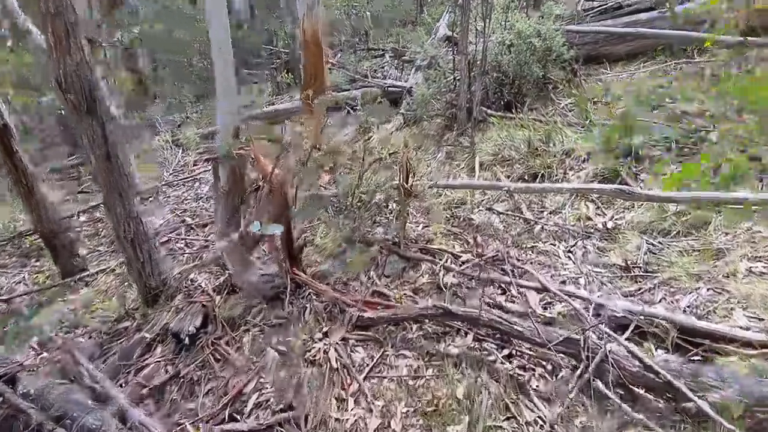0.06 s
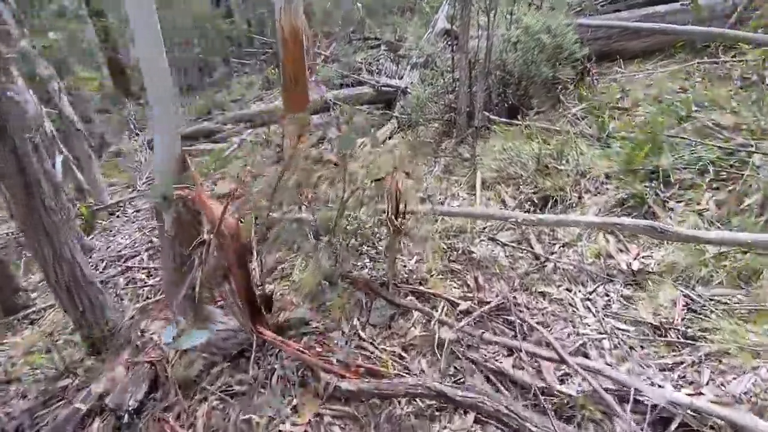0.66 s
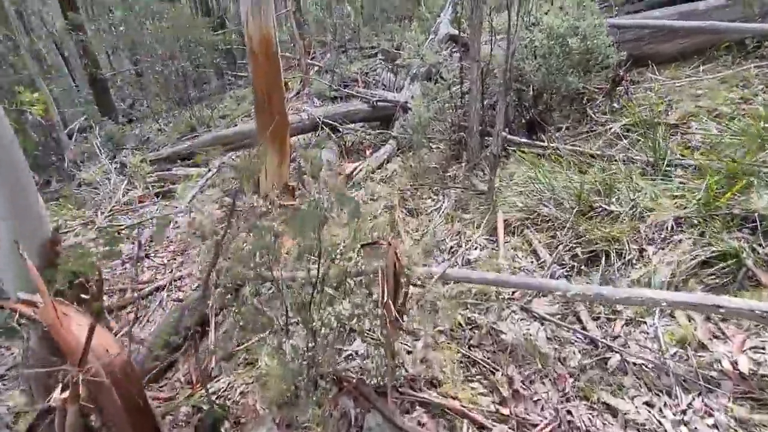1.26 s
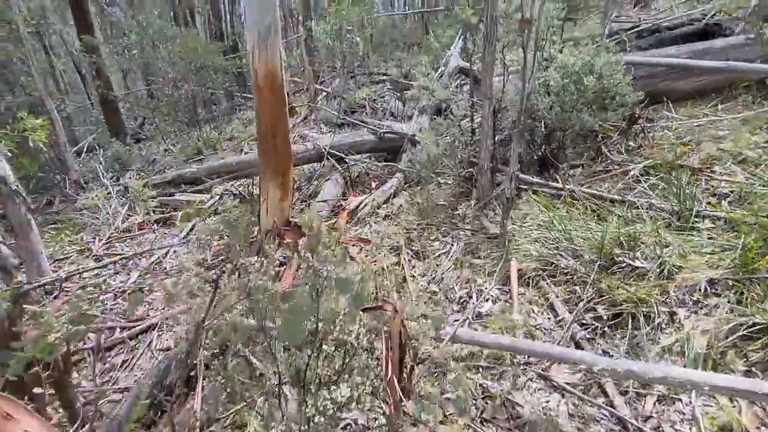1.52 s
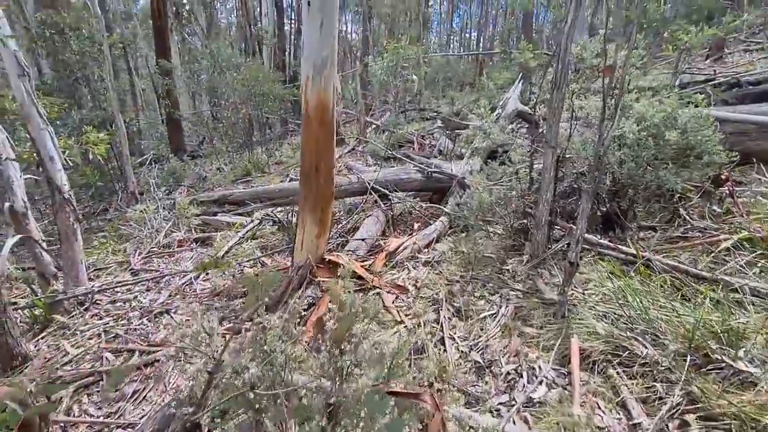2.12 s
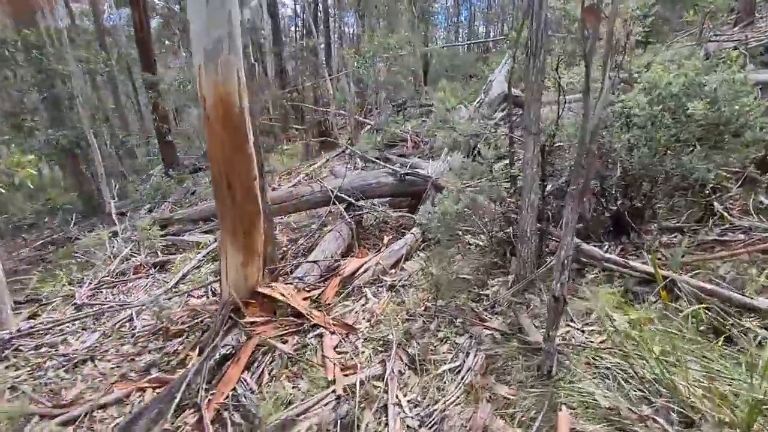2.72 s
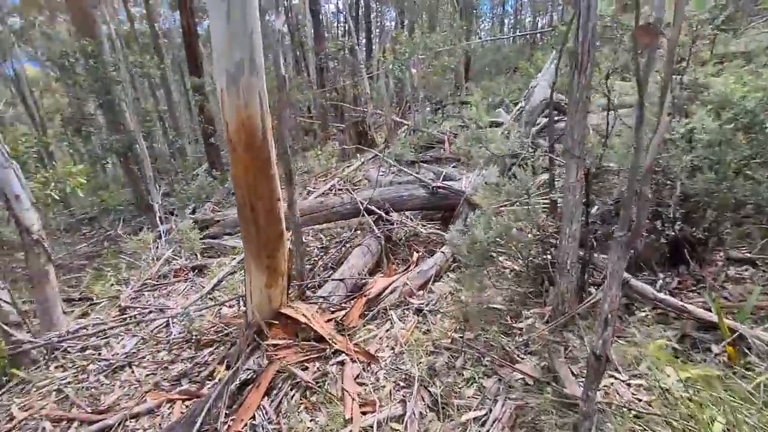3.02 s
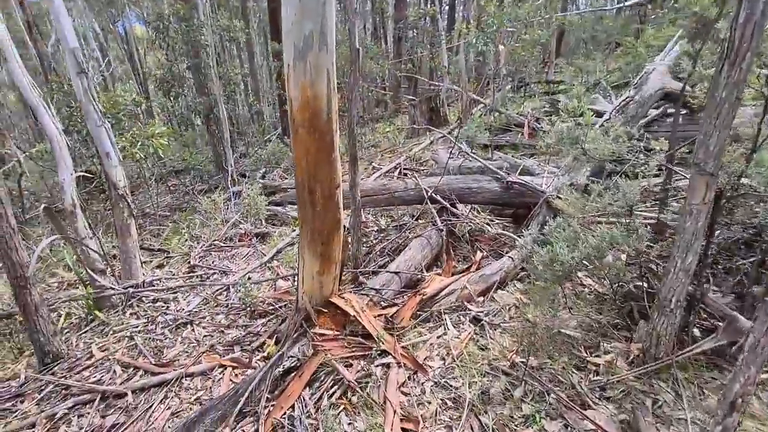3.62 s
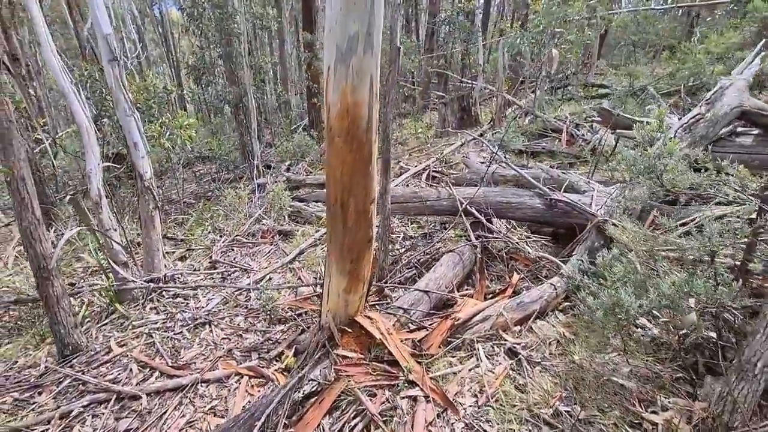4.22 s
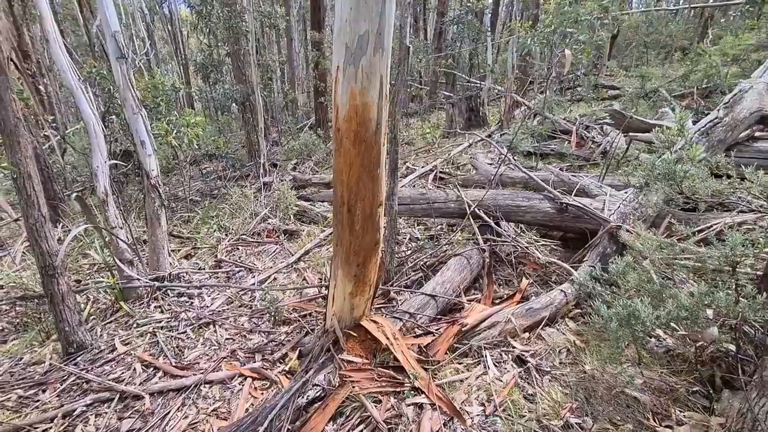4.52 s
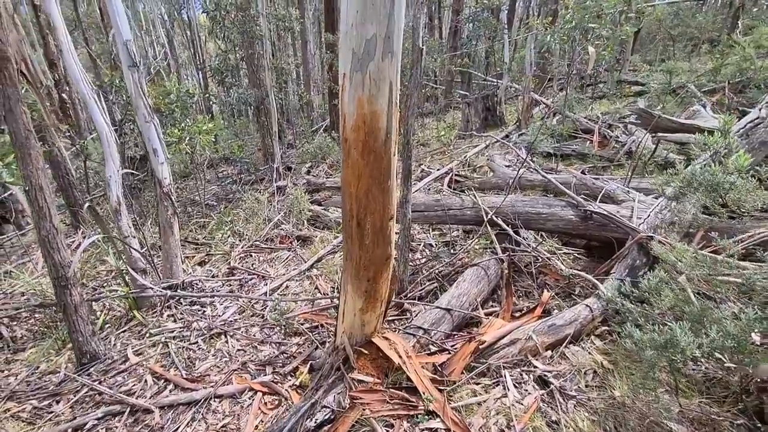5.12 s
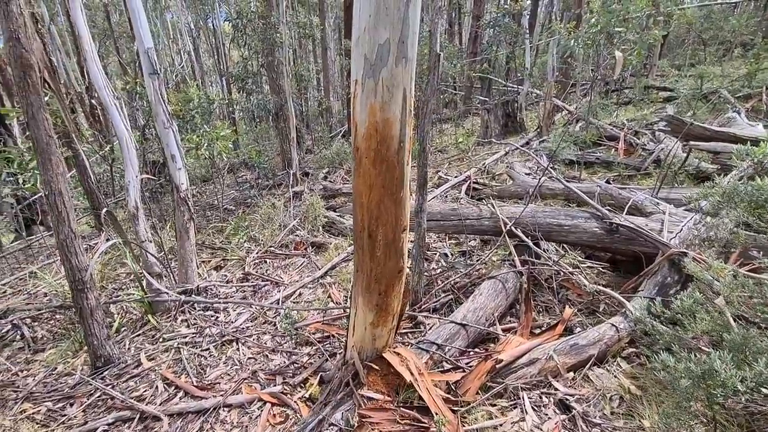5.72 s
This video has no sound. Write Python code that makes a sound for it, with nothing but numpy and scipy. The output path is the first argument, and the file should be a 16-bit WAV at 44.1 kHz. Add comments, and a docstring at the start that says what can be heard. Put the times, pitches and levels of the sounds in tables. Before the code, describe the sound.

In a still forest, a hand-held microphone follows someone treading slowly through brittle leaves, bark and sticks. At first, loud clicks and low, gritty rubs hit the right channel over dull crunching. Then the crackle brightens, with sharp twig snaps, brief shoe scuffs and another short bump on the microphone. After one last firm crunch the steps fade to light ticks, with faint forest air underneath.

```python
"""Slow footsteps through dry leaves, bark and sticks in a still forest, heard from a hand-held camera.
Each step crushes a swarm of brittle leaves over soft soil. Twigs snap, the shoe scuffs, stalks tick.
Mostly early on, something like passing scrub knocks and rubs the right microphone, and a few soft
bumps sway the camera. A faint hush of forest air lies underneath."""
import sys
import numpy as np
from scipy import signal
from scipy.io import wavfile
from scipy.ndimage import uniform_filter1d

SR = 44100
rng = np.random.default_rng(int(sys.argv[2]) if len(sys.argv) > 2 else 0)


def dump_mix(stems):
    """Bounce the given channels to the path in sys.argv[1] as a 16-bit WAV at rate SR."""
    frames = np.atleast_2d(stems).T  # one column per channel
    limited = np.clip(frames, -1, 1)  # hard clip at full scale
    pcm = np.round(limited * 32767).astype(np.int16)
    wavfile.write(sys.argv[1], SR, pcm)


N = 254016
TIME = np.arange(N) / SR
CONTROL_TIME = TIME[::64]

# A foot presses or drags through the litter:
# (time at full weight [s], rise [s], hold [s], crunch [dB], soil [dB], fizz relative to crunch [dB])
FOOT_PRESSES = [(0.0, .02, .1, -44, -57.5, -14), (0.133, .015, 0.021, -33.5, -50.5, -16.5),
                (0.33, 0.13, .08, -46, -53.5, -8.5), (0.462, 0.054, 0.16, -48.5, -61.5, -9.5),
                (0.811, 0.36, 0.13, -52, -61.5, -12), (0.968, 0.023, 0.012, -30.5, -51, -15),
                (1.058, 0.12, 0.072, -36.5, -54.5, -15), (1.264, 0.3, 0.13, -45, -53.5, -19),
                (1.43, .05, 0.11, -51.5, -57.5, -15), (1.611, .1, 0.16, -49.5, -68, -15),
                (1.85, 0.25, 0.18, -53.5, -63.5, -19), (2.076, .12, 0.057, -49.5, -62.5, -21),
                (2.289, 0.11, .05, -42, -57, -17.5), (2.359, 0.024, 0.079, -37, -58, -11.5),
                (2.561, 0.13, 0.076, -34.5, -45, -16), (2.695, 0.027, 0.012, -34, -47, -10),
                (2.785, .04, 0.17, -64.5, -64, -4.5), (3.065, .01, 0.0091, -51.5, -61.5, -14),
                (3.308, 0.083, 0.012, -40.5, -48, -15), (3.479, 0.12, 0.032, -37.5, -59.5, -9.5),
                (3.557, 0.017, 0.087, -43.5, -64.5, -8), (3.725, 0.15, 0.29, -44, -60.5, -16.5),
                (4.083, 0.045, 0.29, -50.5, -63, -20.5), (4.546, 0.52, 0.15, -62.5, -66, -15),
                (4.81, 0.041, 0.036, -26.5, -48, -13.5), (4.967, 0.026, 0.02, -39, -65, -12.5),
                (5.122, 0.036, 0.033, -50.5, -75.5, -16.5), (5.409, 0.13, 0.14, -52, -67, -21)]
# How bright the crunch and ticks sound: muffled at first, as if a microphone were covered,
# then clear from about 1.7 s: (time [s], treble gain [dB])
TREBLE_OPENNESS = [(0, -12.5), (.35, -7.5), (.8, -16.5), (1.45, -21.5), (1.7, -0.5), (3.5, 0.5), (4.1, -2),
                   (5.76, -2)]
# Tone of the leaves' crisp body and fine fizz on each side: (frequency [Hz], gain [dB])
CRISP_LEFT_EQ = [(200, -17), (900, -17), (1400, -12), (2200, -15), (3000, -2), (4200, -18), (6000, -18.5),
                 (8000, -29.5), (10000, -26), (13000, -14), (16000, -26.5)]
CRISP_RIGHT_EQ = [(200, -46.5), (900, -16), (1400, -8), (2300, -11), (3100, 0.5), (4300, 2.5), (5600, 3.5),
                  (6500, -5), (7600, -33.5), (9000, -32), (10300, -41.5), (13000, -34), (16000, -42.5)]
FIZZ_LEFT_EQ = [(3000, -46.5), (6000, -11), (8000, -9.5), (10000, -2), (13000, 4.5), (16000, 1)]
FIZZ_RIGHT_EQ = [(3000, -21.5), (6000, 0), (7700, -13), (9000, 0.5), (10300, 4.5), (13000, -1),
                 (16000, -14)]
# The dull give of soil and bark: (frequency [Hz], gain [dB])
SOIL_EQ = [(25, -2.5), (80, 2.5), (140, -2.5), (250, 0.5), (430, 2), (560, -3.5), (750, 0.5), (1000, -7),
           (1400, -2.5), (2200, -8), (5000, -24)]
# Larger twigs and bark breaking:
# (time [s], level [dB], pitch [Hz], tear decay [s], relative splinter hiss [dB], left trim [dB])
BIG_SNAPS = [(0.1313, -17, 3130, 0.00016, -33, -13), (0.45, -35, 3430, 0.0019, -12.5, -4),
             (0.7328, -40.5, 780, 0.00048, -50, 1), (0.8187, -47, 1380, 0.00072, -43, 0.5),
             (0.97, -35, 3700, .0017, -35, -4), (0.9843, -27.5, 2850, 0.00024, -35, -13),
             (1.094, -27, 3660, 0.00077, -45, -13), (1.1152, -24.5, 1700, 0.00041, -36, -30),
             (1.4491, -43, 2210, 0.0004, -39, 2), (2.1154, -37, 5850, 0.00055, -16.5, -28),
             (2.3669, -26.5, 3640, 0.0031, -15, -25), (2.381, -28, 3650, 0.00066, -29, -29),
             (2.451, -29.5, 3970, .0015, -20.5, -28), (2.5907, -34.5, 786, .00045, -31, -4),
             (2.6997, -10, 3580, 0.0005, -34, -4.5), (2.7109, -21, 5000, 0.00034, -9.5, -11),
             (2.7681, -25.5, 4600, .0014, -4, -14), (3.0716, -34, 3580, 0.0026, -34, -2.5),
             (3.179, -50, 3680, .0013, -13, -7), (3.2313, -41, 3350, .002, -24, -5),
             (3.3217, -20.5, 4030, 0.00093, -8.5, -4), (3.5467, -29.5, 5000, 0.004, -6.5, -19),
             (3.5766, -27, 4500, 0.00082, -13.5, -22), (3.606, -20, 3530, 0.00055, -22, -16),
             (3.6273, -24.5, 5000, 0.00091, -15, -16), (3.754, -32.5, 6100, 0.0015, -13.5, -20),
             (3.851, -26.5, 4200, 0.00019, -23, -16), (3.94, -27, 5970, 0.00056, -28, -14),
             (4.0963, -40, 1260, 0.00044, -25, -0.5), (4.25, -43, 1010, 0.00068, -30, -23),
             (4.3539, -37, 1770, 0.0016, -15.5, -0.5), (4.417, -40, 3930, 0.0014, -36, -5.5),
             (4.5434, -38, 3700, 0.0014, -30, -8.5), (4.729, -48.5, 3800, 0.0018, -39, -4),
             (4.8133, -27.5, 3000, 0.004, -24, -8), (4.9765, -45, 3250, .0006, -11, -10),
             (5.3033, -46.5, 4400, .0008, -38, -9), (5.4267, -39, 4240, 0.00025, -20, -5.5),
             (5.7267, -36, 4930, 0.0017, -24, -14)]
# Tone of breaking wood on each side: (frequency [Hz], gain [dB])
SNAP_LEFT_EQ = [(100, 2), (600, 6.5), (1400, 8), (2900, 1), (4200, -15), (6000, -13), (8000, -12),
                (12000, -4), (16000, 8.5)]
SNAP_RIGHT_EQ = [(100, 0.5), (600, 1.5), (1400, -2.5), (3200, 1.5), (5800, 1), (6600, -3), (7600, -24),
                 (10300, -21.5), (16000, -11.5)]
# The shoe slides on leaves or bark: (time [s], length [s], level [dB], pitch [Hz], bandwidth [Hz])
SHOE_SCUFFS = [(0.32, 0.22, -43.5, 3930, 900), (0.949, 0.079, -41, 3700, 1500),
               (1.062, 0.085, -46.5, 3820, 1200), (2.346, 0.14, -39.5, 3600, 1205),
               (2.562, 0.033, -50, 1480, 600), (3.305, 0.054, -47, 1530, 700),
               (3.485, 0.051, -50, 1370, 350), (4.796, 0.071, -42, 1420, 600)]
# Knocks on the right microphone:
# (time [s], level [dB], contact time [s], relative rattle [dB], stick pitch [Hz])
MIC_KNOCKS = [(0.1325, -8.5, 0.00036, -35, 697), (0.135, -6.5, 0.00026, -29, 2940),
              (0.1436, -8, 0.0003, -41, 720), (0.1453, 0, 0.00023, -10, 1230),
              (0.4124, -22, 0.00029, -7.5, 1340), (1.113, -9.5, 0.00012, -25, 1800),
              (1.1337, -.5, 0.00012, -22.5, 1280), (1.2329, -11.5, 0.00019, -35, 1400),
              (1.2572, -15, 0.00013, -32, 1300), (1.3303, -8.5, 0.00054, -40, 600),
              (1.3665, -3.5, 0.00014, -59, 1410), (1.5321, -10.5, 0.00012, -13.5, 1620),
              (1.5749, 0, .00021, -36, 1240), (1.6766, 1.5, .00011, -17.5, 1150),
              (1.6984, 0.5, 0.00014, -17, 1300), (1.7672, -3.5, 0.00011, -5.5, 1270),
              (1.7688, -14, 0.00023, -10, 1900), (2.7714, -2, 0.00042, -14.5, 470),
              (2.82, -1, 0.00037, -8.5, 448)]
# Resonances of the camera housing: (frequency [Hz], bandwidth [Hz], gain [dB])
HOUSING_MODES = [(605, 140, -5), (1900, 3500, -13.5), (4200, 730, -13), (9400, 2200, -15)]
# Strokes across the right microphone: (time [s], hold [s], boom [dB], scrape [dB])
MIC_RUBS = [(0.135, 0.032, -39, -28.5), (0.332, 0.092, -46, -62), (1.017, 0.006, -40, -44),
            (1.109, 0.023, -34, -36.5), (1.239, 0.14, -27.5, -39), (1.574, 0.011, -22, -32),
            (1.608, 0.023, -36.5, -39), (1.672, 0.064, -38, -41), (1.769, 0.012, -35.5, -44),
            (2.588, 0.016, -49.5, -42.5), (2.762, 0.077, -44.5, -48), (3.97, 0.047, -48, -50),
            (4.047, 0.0084, -42, -44.5)]
# Tone of the rubbing's boom and scrape: (frequency [Hz], gain [dB])
BOOM_EQ = [(20, -17), (45, -9.5), (62, -5), (78, 5), (98, -6), (130, -14.5), (250, -13), (800, -71.5)]
SCRAPE_EQ = [(40, -11), (150, -3.5), (400, -1), (900, -7.5), (1600, -9.5), (3000, -13), (6000, -26.5),
             (7600, -34.5), (10000, -27.5), (16000, -41.5)]
# Soft bumps that sway the camera: (time [s], level [dB], pitch [Hz])
CAMERA_BUMPS = [(0.147, -28.5, 45.5), (0.409, -29, 78), (2.632, -25, 44.6), (4.046, -31, 81)]
# Tone of the forest air: (frequency [Hz], gain [dB])
AIR_EQ = [(25, -10), (100, -7.5), (450, -2.5), (1000, -10.5), (1400, -9), (2200, -12.5), (3200, -12),
          (5500, -13), (7600, -34), (11000, -25.5), (16000, -26.5)]


def leaves(bands=10):
    """Leaves of many sizes crack under the foot; each rings for a few cycles, the finest only fizz."""
    crunch_db, _, fizz_db = tread()
    flakes, fine = np.zeros((2, 2, N))
    for hz in np.geomspace(1100, 12000, bands):
        breaks = cracks(per_s=230, spread_db=2)
        ears = breaks + 0.9 * jostle(breaks, t60=0.022)
        flakes += unit_rms(ring(ears, hz, quality=3.1)) * np.sqrt(hz / 4000)
        fine += ears
    crisp = unit_rms(np.array([eq(flakes[0], CRISP_LEFT_EQ), eq(flakes[1], CRISP_RIGHT_EQ)]))
    treble = signal.sosfiltfilt(signal.butter(4, 4600, "high", fs=SR, output="sos"), crisp)
    crisp += (gain_of(openness()) - 1) * treble
    fizz = unit_rms(np.array([eq(fine[0], FIZZ_LEFT_EQ), eq(fine[1], FIZZ_RIGHT_EQ)]))
    # At first something lies against the right microphone and muffles the fizz.
    fizz[1] *= gain_of(np.interp(TIME, [1.45, 1.7], [-14.5, 0]))
    force = gain_of(crunch_db) * jerks(depth_db=0.96)
    return force * (gain_of(-2.5) * crisp + gain_of(fizz_db + 0.5) * fizz)


def tread():
    """The weight of the feet as envelopes in dB: crunch, soil, and fizz relative to the crunch."""
    *_, crunch_db, soil_db, fizz_db = np.transpose(FOOT_PRESSES)
    crunch = summed_db(presses(tail_db=-18.5), crunch_db)
    ground = summed_db(presses(tail_db=-10.5), soil_db)
    fizz = summed_db(presses(tail_db=-20), crunch_db + fizz_db)
    return crunch, ground, fizz - crunch


def presses(tail_db):
    """Each press swells, holds and dies as the weight settles; a slow tail follows as the litter lifts."""
    envelopes = []
    for s, rise, hold, *_ in FOOT_PRESSES:
        crush = swell(s, rise, hold, release_db_per_s=222.5)
        spring_back = gain_of(tail_db) * swell(s, rise, hold, release_db_per_s=39)
        envelopes.append(np.maximum(crush, spring_back))
    return envelopes


def jerks(depth_db, size=500):
    """Weight comes down in small jerks, some ten milliseconds long."""
    wobble = uniform_filter1d(uniform_filter1d(rng.standard_normal(N), size), size)
    return gain_of(depth_db * unit_rms(wobble))


def openness():
    """Gain curve in dB for the crunch's treble and the ticks: muffled at first, then clear."""
    return np.interp(TIME, *np.transpose(TREBLE_OPENNESS))


def cracks(per_s, spread_db, cap=3.46):
    """Tiny fractures as random clicks: many weak, a few up to cap * spread_db stronger."""
    at = np.flatnonzero(rng.random(N) < per_s / SR)
    strength, sign = rng.random((2, N))[:, at]
    level_db = spread_db * np.minimum(-np.log(1 - strength), cap)
    clicks = np.zeros(N)
    clicks[at] = np.sign(sign - 0.5) * gain_of(level_db)
    return unit_rms(clicks)


def jostle(breaks, t60):
    """Each crack stirs its neighbours: a brief dying hiss, different on each side."""
    decay = np.exp(-2 * np.log(1000) / (t60 * SR))
    energy = signal.lfilter([1], [1, -decay], breaks ** 2 + 1e-12)
    return unit_rms(np.sqrt(energy) * (rng.random((2, N)) - 0.5))


def soil():
    """Damp layers under the leaves give way with a dull, grainy crush."""
    _, soil_db, _ = tread()
    centre = cracks(per_s=900, spread_db=2)
    grains = [centre + 0.49 * cracks(per_s=1500, spread_db=0.5) for _ in range(2)]
    crush = np.array([unit_rms(eq(side, SOIL_EQ)) for side in grains])
    return crush * gain_of(soil_db) * gain_of([[0.3], [1.5]])


def twigs(size=2600):
    """A twig breaks with a sharp crack and a spray of tearing fibres, ringing in two bending modes."""
    t, out = TIME[:size], np.zeros((2, N))
    splinter_band = signal.butter(3, [8300, 15000], "band", fs=SR, output="sos")
    burst_gain = np.sqrt(0.005 * SR / size)  # gives a snap the energy of a 5 ms burst
    for s, db, hz, tear, splinter_db, left_db in BIG_SNAPS + small_twigs():
        tearing = 0.32 * np.exp(-t / tear) + 0.14 * np.exp(-t / 0.0031)
        fibres = rng.standard_normal((3, size)) * tearing  # left, right, centre
        for side, (tone, side_db) in enumerate([(SNAP_LEFT_EQ, left_db), (SNAP_RIGHT_EQ, 0)]):
            crack = 1.27 * (t == 0) + fibres[2] + 1.1 * fibres[side]
            body = ring(ring(crack, hz, quality=1), hz, quality=1)
            modes = 1.5 * ring(crack, hz * 0.905, quality=7) + 0.6 * ring(crack, hz * 0.505, quality=4)
            wood = unit_rms(eq(body + modes + 0.2 * crack, tone, size=512))
            splinters = gain_of(splinter_db) * unit_rms(signal.sosfilt(splinter_band, crack))
            add(out[side], s, (wood + splinters) * gain_of(db + side_db) * burst_gain)
    echoes = np.array([trunk_echoes(side, t60=0.05) for side in out])
    return gain_of(-1) * out + gain_of(-15.5) * echoes


def small_twigs(count=30, tear_s=0.0008, splinter_db=-22, left_db=-7.5):
    """Rows of random small snaps, louder under a heavy foot and softer while the treble is muffled."""
    crunch_db, _, _ = tread()
    level_db = crunch_db + openness() / 2 + 2
    snaps = []
    for when, strength, thinness in rng.random((count, 3)):
        at = int(when * N)
        db = level_db[at] + 3 * (2 * strength - 1)
        hz = 3900 * 2 ** (0.3 * (2 * thinness - 1))
        snaps.append((TIME[at], db, hz, tear_s, splinter_db, left_db))
    return snaps


def trunk_echoes(x, t60, size=12000):
    """Litter and trunks throw back sparse, dying echoes."""
    t = TIME[:size]
    taps = rng.standard_normal(size) * (rng.random(size) < 0.12)
    taps *= gain_of(-60 * t / t60) * (t > 0.001)
    return signal.oaconvolve(x, taps / np.linalg.norm(taps))[:N]


def scuffs(size=16000):
    """Quick slips make a leaf or a sheet of bark rasp in one band; it bites at once and trails off."""
    out = np.zeros((2, N))
    slips = np.array([cracks(per_s=1200, spread_db=3.5) for _ in range(3)])  # left, right, centre
    for s, length, db, hz, width in SHOE_SCUFFS:
        age = TIME[:size] / (length / 5)
        stroke = gain_of(db) * age * np.exp(1 - age)
        drive = slips[:, round(s * SR):][:, :size]
        left_db = -2 - 5 * np.log2(hz / 1300)  # the left microphone is the duller one
        for side, side_db in enumerate([left_db, 0]):
            rasp = ring(ring(drive[2] + drive[side], hz, hz / width), hz, 0.5 * hz / width)
            add(out[side], s, gain_of(side_db) * stroke * unit_rms(rasp))
    return out


def ticks(bands=6):
    """Stalks and flakes of bark tick singly, also while the trodden litter springs back."""
    crunch_db, _, _ = tread()
    stalks = np.zeros((2, N))
    for hz in np.geomspace(1400, 5000, bands):
        breaks = cracks(per_s=12, spread_db=4, cap=2)
        ears = breaks + 0.8 * jostle(breaks, t60=0.01)
        stalks += ring(ring(ears, hz, quality=1.7), hz, quality=1)
    ticking = np.array([gain_of(-10.5) * eq(stalks[0], SNAP_LEFT_EQ), eq(stalks[1], SNAP_RIGHT_EQ)])
    level_db = -58 + 0.6 * (crunch_db - crunch_db.mean()) + openness()
    return unit_rms(ticking) * gain_of(level_db)


def knocks(size=2400, lead_s=0.0054):
    """Pressure builds in the microphone port, lets go, rebounds and leaves stick and housing rattling."""
    t, out = TIME[:size] - lead_s, np.zeros(N)
    before, after = np.minimum(t, 0), np.maximum(t, 0)
    burst_gain = np.sqrt(0.00044 * SR / size)
    for s, db, contact, rattle_db, stick_hz in MIC_KNOCKS:
        push = np.exp(before / contact - (after / (0.7 * contact)) ** 2)
        rebound = (1 - np.exp(-(after / contact) ** 2)) * np.exp(-after / (1.09 * contact))
        chatter = rng.standard_normal(size) * (t > 0) * np.exp(-after / 0.0022)
        housing = sum(gain_of(mode_db) * ring(chatter, hz, hz / width)
                      for hz, width, mode_db in HOUSING_MODES)
        stick = np.sin(2 * np.pi * stick_hz * after) * np.exp(-after * stick_hz / 2.1)
        hardness = min(1, (0.00049 / contact) ** 1.8)  # a slow, soft contact wakes the housing less
        rattle = (0.64 * hardness * unit_rms(housing) + 0.72 * unit_rms(stick)) * burst_gain
        add(out, s - lead_s, gain_of(db) * (rebound - push + gain_of(rattle_db) * rattle))
    out = signal.sosfilt(signal.butter(8, 12300, fs=SR, output="sos"), out)
    return signal.sosfilt(signal.butter(2, 70, "high", fs=SR, output="sos"), out)


def rubbing(rise_s=0.013):
    """Something sticks and slips on the housing: a low boom and a gritty scrape."""
    strokes = [swell(s, rise_s, hold, release_db_per_s=651) for s, hold, *_ in MIC_RUBS]
    *_, boom_db, scrape_db = np.transpose(MIC_RUBS)
    rumble = signal.hilbert(eq(rng.standard_normal(N), BOOM_EQ, size=8192))
    boom = unit_rms(rumble.real / abs(rumble) ** 0.47)  # steady pressure evens out the swings
    scrape = unit_rms(eq(cracks(per_s=2400, spread_db=0), SCRAPE_EQ))
    return gain_of(summed_db(strokes, boom_db)) * boom + gain_of(summed_db(strokes, scrape_db)) * scrape


def bumps(size=5000):
    """Each bump on the camera is a swing or two of deep bass."""
    out = np.zeros(N)
    for s, db, hz in CAMERA_BUMPS:
        half_cycles = 2 * hz * TIME[:size]
        envelope = gain_of(db) * half_cycles * np.exp(1 - half_cycles)
        add(out, s, -envelope * np.sin(np.pi * half_cycles))
    return out


def forest_air():
    """A faint, wide bed of forest hush."""
    return gain_of(-68) * np.array([unit_rms(eq(rng.standard_normal(N), AIR_EQ)) for _ in range(2)])


def swell(s, rise, hold, release_db_per_s):
    """An envelope that climbs 20 dB per rise time up to time s, holds, then dies away."""
    early, late = np.maximum(s - CONTROL_TIME, 0), np.maximum(CONTROL_TIME - s - hold, 0)
    return gain_of(-20 * early / rise - release_db_per_s * late)


def summed_db(swells, levels_db):
    """Level in dB of overlapping swells, whose powers add."""
    power = gain_of(levels_db) ** 2 @ np.square(swells)
    return np.interp(TIME, CONTROL_TIME, 10 * np.log10(power + 1e-14))


def eq(x, points, size=2048):
    """Minimum-phase EQ, so that clicks keep their sharp attacks."""
    hz, db = np.transpose(points)
    bin_hz = abs(np.fft.fftfreq(size, 1 / SR))
    log_gain = np.log(gain_of(np.interp(np.log(bin_hz + 1), np.log(hz), db)))
    taps = np.fft.ifft(np.exp(np.conj(signal.hilbert(log_gain)))).real
    return signal.oaconvolve(x, taps[:size // 2])[:len(x)]


def ring(x, hz, quality):
    """One damped resonance with unity gain at its peak."""
    return signal.lfilter(*signal.iirpeak(min(hz, SR / 3), max(quality, 1), fs=SR), x)


def gain_of(db):
    """Decibels to amplitude."""
    return 10 ** (np.asarray(db) / 20)


def unit_rms(x):
    """Scales to an rms of 1."""
    return x / np.sqrt(np.mean(x ** 2) + 1e-20)


def add(mix, s, sound):
    """Mixes a sound in at time s."""
    part = mix[max(round(s * SR), 0):][:len(sound)]
    part += sound[:len(part)]


def scene():
    """Steps and air reach both microphones; touches on the housing hardly reach the left one."""
    steps = leaves() + soil() + scuffs() + twigs() + ticks()
    touches = knocks() + rubbing() + bumps()
    return steps + forest_air() + touches * gain_of([[-30], [0]])


def record(dry):
    """Hard-limits the peaks at full scale, then cuts the very top."""
    low_pass = signal.firwin(255, 15950, window=("kaiser", 8), fs=SR)
    return signal.oaconvolve(np.clip(dry, -1, 1), low_pass[None], "same")


dry = scene()
out = record(dry)
dump_mix(out)
```